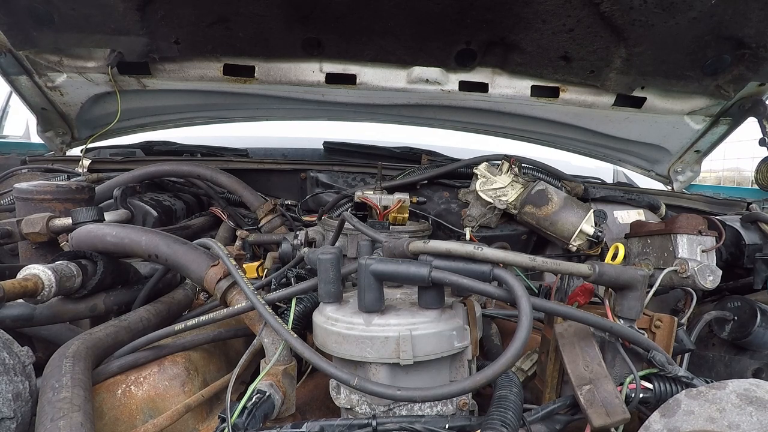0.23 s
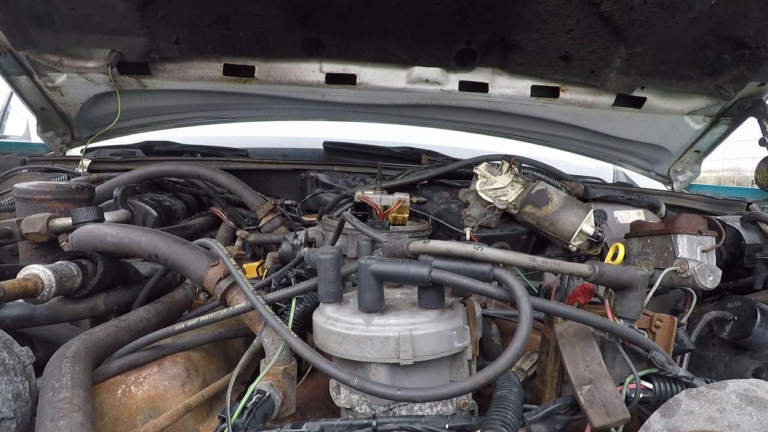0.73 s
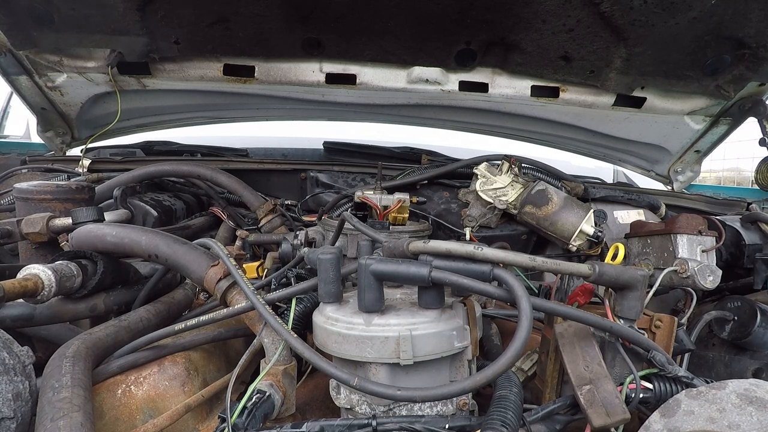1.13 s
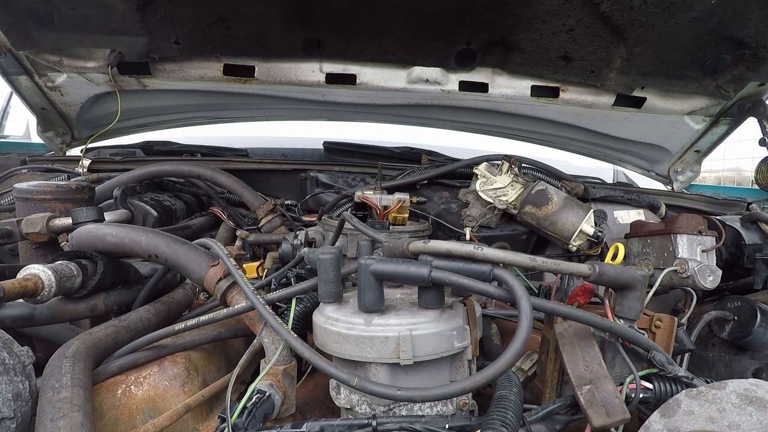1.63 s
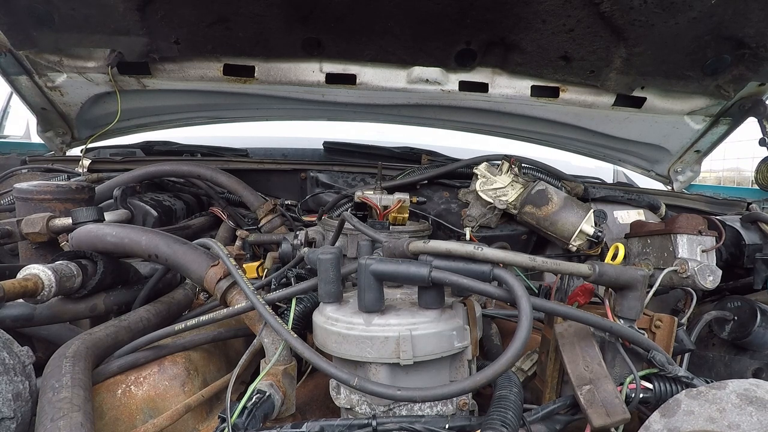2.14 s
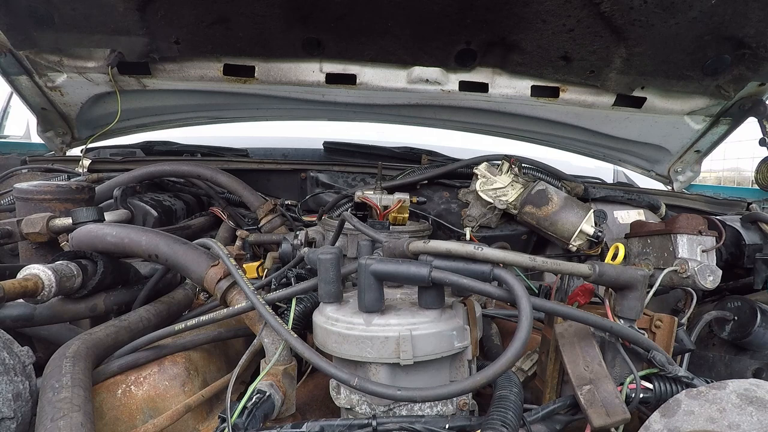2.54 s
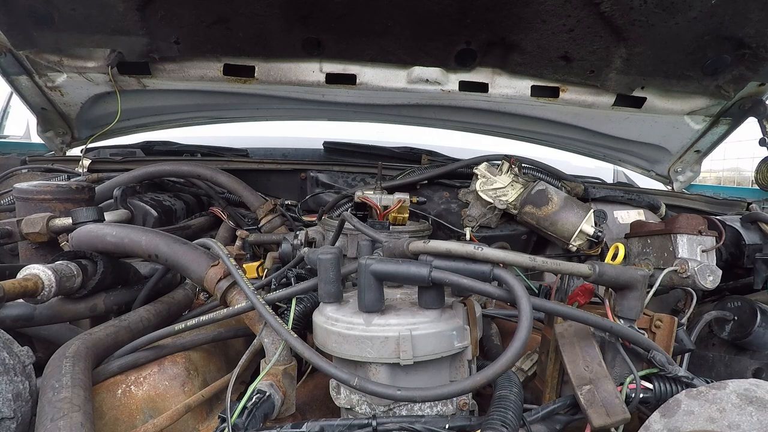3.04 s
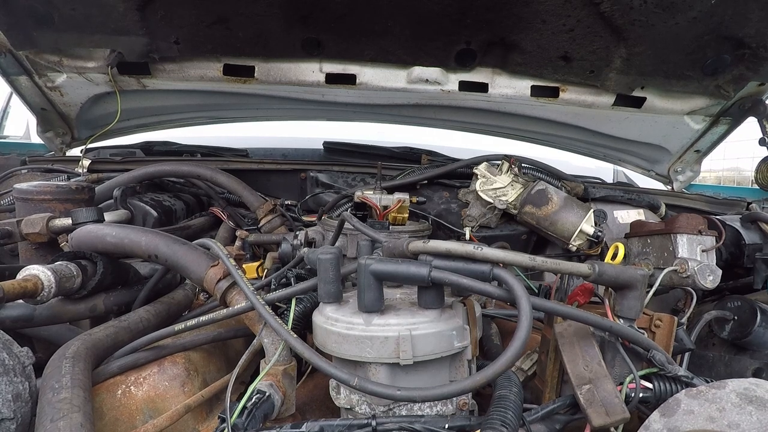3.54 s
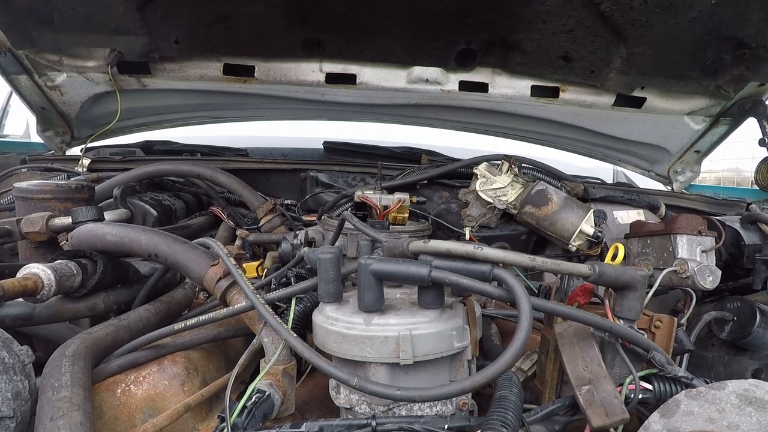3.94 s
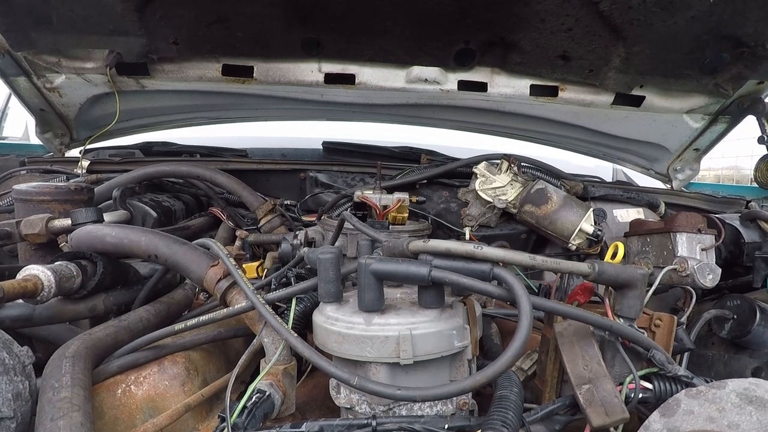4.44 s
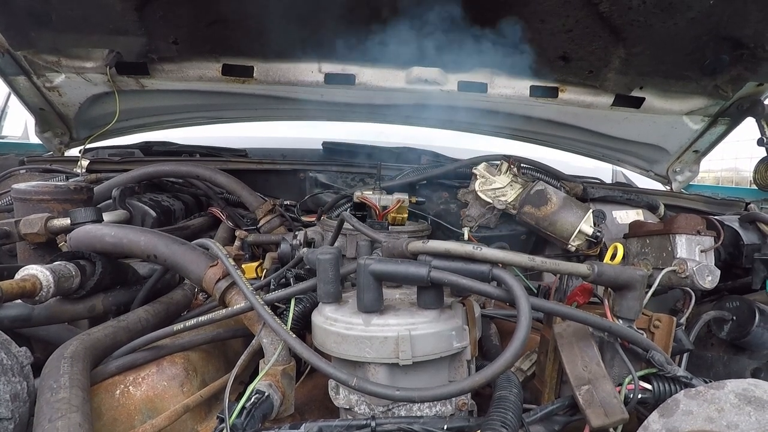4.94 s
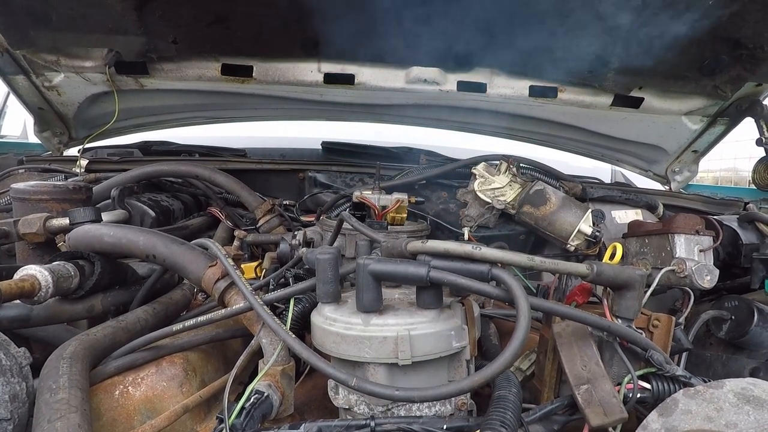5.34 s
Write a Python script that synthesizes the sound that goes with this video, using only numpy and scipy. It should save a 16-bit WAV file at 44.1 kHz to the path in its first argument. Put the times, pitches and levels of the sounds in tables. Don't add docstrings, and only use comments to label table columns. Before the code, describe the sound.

Steady duct hum and sharp contact clicks, then gritty, whirring starter gear noise surging and sagging with intake hisses and thuds, finally coasting down.

```python
import sys
import numpy as np
from scipy import signal
from scipy.fft import rfft, irfft
from scipy.io import wavfile
from scipy.ndimage import uniform_filter1d

SR = 44100
rng = np.random.default_rng(int(sys.argv[2]) if len(sys.argv) > 2 else 0)


def put_to_file(sound):
    columns = np.atleast_2d(sound).T
    safe = np.clip(columns, -1, 1)
    whole_steps = np.round(safe * 32767)
    wavfile.write(sys.argv[1], SR, whole_steps.astype(np.int16))


def invert_db(level):
    return 10 ** (np.asarray(level, dtype=float) / 20)


N = 246078
TIME_S = np.arange(N) / SR

START_S = 3.058
STROKE_S = 0.042
MEAN_LOAD_DB, MEAN_AIR_DB = -30, -50

# (time [s], level [dB])
AIR = [(3.07, -57), (3.15, -51.5), (3.42, -46), (3.46, -47), (3.59, -38), (3.715, -42), (3.76, -62.5),
       (3.84, -65), (3.88, -54), (4.11, -53.5), (4.25, -48), (4.32, -53.5), (4.36, -46), (4.57, -54.5),
       (4.84, -45.5), (4.93, -52), (5.42, -53.5), (5.58, -69.5)]
# (time [s], share of speed lost [0-1], tooth tone [dB], change of load [dB])
COMPRESSIONS = [(3.14, .03, -17.5, -2.5), (3.241, 0.29, -20, -2.5), (3.381, 0.19, -19, -2.5),
                (3.49, .12, -47, -1.5), (3.591, 0.021, -38, 2), (3.78, 0.096, -21, -5.5),
                (3.87, 0.025, -20, -0.5), (4.0, .17, -28, -2.5), (4.058, 0.0085, -27, 4),
                (4.131, 0.11, -47, 5.5), (4.48, 0.022, -30, 0.5), (4.781, .02, -45, 4),
                (4.881, 0.0099, -36, 2), (4.99, 0.049, -35, -7.5), (5.088, .04, -43, -4),
                (5.244, .17, -23, -5), (5.351, .14, -20.5, -4.5), (5.47, .15, -19, -3)]


def rms_one(x):
    return x / np.sqrt(np.mean(x ** 2) + 1e-20)


def in_time(rows):
    s, *columns = np.transpose(rows)
    return [np.interp(TIME_S, s, column) for column in columns]


def drift(rate_hz):
    r = np.exp(-2 * np.pi * rate_hz / SR)
    noise = rng.standard_normal(N + SR)
    return rms_one(signal.lfilter([1], [1, -2 * r, r * r], noise)[SR:])


def coloured(spectrum, lifts=()):
    hz, points = np.arange(N // 2 + 1) * SR / N + 1, np.array(spectrum)
    level_db = np.interp(np.log(hz), np.log(points[:, 0]), points[:, 1])
    for centre_hz, width_hz, lift_db in lifts:
        level_db = level_db + lift_db / (1 + (2 * (hz - centre_hz) / width_hz) ** 2)
    return rms_one(irfft(rfft(rng.standard_normal(N)) * invert_db(level_db), N))


def resonate(x, modes, flicker_db=0.0):
    out = 0
    for k, (hz, width_hz, db) in enumerate(modes):
        r = np.exp(-np.pi * width_hz / SR)
        a = [1, -2 * r * np.cos(2 * np.pi * hz / SR), r * r]
        b = [(1 - r * r) / 2, 0, (r * r - 1) / 2]
        gain_db = db + flicker_db * np.clip(drift(14.4), -2.5, 1.5) if flicker_db else db
        out = out + (-1) ** k * invert_db(gain_db) * signal.lfilter(b, a, x + 1e-18)
    return out


def ring(clicks, hz, t60_s):
    r, w = invert_db(-60 / (t60_s * SR)), 2 * np.pi * hz / SR
    return signal.lfilter([0, np.sin(w)], [1, -2 * r * np.cos(w), r * r], clicks + 1e-18)


def band(x, low_hz, high_hz):
    return signal.sosfilt(signal.butter(2, [low_hz, high_hz], "band", fs=SR, output="sos"), x)


def steep(x, low_hz, high_hz):
    return band(band(x, low_hz, high_hz), low_hz, high_hz)


def even(x, span_s):
    return x / np.sqrt(uniform_filter1d(x ** 2, int(span_s * SR)) + 1e-12)


def after(s, rise_s, decay_s):
    t = np.maximum(TIME_S - s, 0)
    shape = (1 - np.exp(-t / rise_s)) ** 2 * np.exp(-t / decay_s)
    return shape / shape.max()


def swell(s, width_s):
    return np.exp(-((TIME_S - s) / width_s) ** 2)


def engaged():
    return np.clip((TIME_S - START_S) / 0.0069, 0, 1)


def background():
    # (frequency [Hz], level [dB])
    floor_colour = [(1940, -15), (3300, -3), (3940, 5), (4620, -0.5), (5390, 3), (9540, 1), (13300, -12),
                    (14300, -16)]
    floor_db, ducked_db = -67, -8
    return invert_db(floor_db + ducked_db * engaged()) * coloured(floor_colour)


def blower():
    # (frequency [Hz], level [dB])
    air_colour = [(53, -59), (90, -27), (123, -22), (150, -11), (242, -13), (345, -5.5), (378, -9.5),
                  (441, -7), (701, -16), (769, -10.5), (1030, -14), (1520, -14), (3600, -33.5), (4680, -68),
                  (7920, -120)]
    # (frequency [Hz], width [Hz], lift [dB])
    duct = [(163.3, 23, 5.5), (235, 90, 10.5), (360, 23, 4), (444, 35, 12.5), (583, 150, 9.5), (790, 76, 9),
            (916, 30, 6.5), (1210, 28, 6), (1520, 73, 7.5), (2190, 520, 1.5)]
    air_db, fade_s = -36.5, 0.31
    wind_db = np.maximum(-53.5 - 8.5 * TIME_S, -72)
    running = np.exp(-np.maximum(TIME_S - START_S, 0) / fade_s)
    flutter = invert_db(.5 * drift(10) + .6 * drift(50))
    air = steep(coloured(air_colour, duct), 58, 2790) * invert_db(air_db) * flutter
    wind = rms_one(band(rng.standard_normal(N), 8.4, 97)) * invert_db(wind_db + 1.0 * drift(3.4))
    return running * air + wind


def ticks():
    # (time [s], level [dB], rattle decay [s], ping [Hz], ping level [dB])
    contacts = [(1.208, -16.5, 0.003, 8000, -18), (1.214, -21, 0.0029, 3900, -27),
                (1.226, -47, 0.018, 967, -31), (1.25, -60, .01, 990, -38), (1.243, -47, .006, 6400, -48),
                (1.322, -39.5, .0075, 2700, -43.5), (1.854, -70, .004, 570, -38),
                (2.332, -39.5, 0.0071, 5560, -37.5), (2.362, -60, .004, 7000, -55),
                (3.057, -20, 0.0023, 2550, -21.5), (3.0575, -40, .013, 710, -15.5),
                (3.063, -29.5, 0.0089, 400, -14), (3.161, -34, 0.0045, 7500, -32),
                (3.845, -47, .0033, 4000, -60), (5.476, -52, 0.003, 700, -29),
                (5.501, -52, .003, 8500, -58)]
    # (frequency [Hz], width [Hz], level [dB])
    case_modes = [(1880, 210, -13), (2700, 460, -12.5), (3900, 300, -6), (5280, 380, -10),
                  (6200, 620, -6.5), (8000, 2500, -9), (9830, 2000, -11), (12400, 910, -19)]
    # (frequency [Hz], level [dB], decay by 60 dB [s])
    knock_modes = [(180, -62, 0.019), (400, -2.5, 0.26), (633, -6, 0.29), (900, 2.5, 0.015),
                   (1598, 0, 0.022), (2550, 12, 0.0034)]
    relay_knock_db, solenoid_knock_db = -16.5, -11
    rattle, knocks, pings = np.zeros(N), np.zeros(N), np.zeros(N)
    grit = rng.standard_normal(N) * invert_db(0.34 * drift(1500))
    for s, db, decay_s, ping_hz, ping_db in contacts:
        at = round(s * SR)
        rattle += invert_db(db) * grit * (after(s, 0.00025, decay_s) + 0.078 * after(s, 0.0014, 0.01))
        knocks[at] = invert_db(ping_db + (relay_knock_db if s < 3 else solenoid_knock_db))
        pings += invert_db(ping_db) * ring(np.arange(N) == at, ping_hz, .012 + 55 / ping_hz)
    body = np.zeros(N)
    for k, (hz, db, t60_s) in enumerate(knock_modes):
        body += (-1) ** k * invert_db(db - 1.5) * ring(knocks, hz, t60_s)
    return 2.4 * resonate(rattle, case_modes) + steep(pings + body, 200, 7800)


def spits():
    # (time [s], hiss peak [dB], thud level [dB], thud [Hz], decay [s])
    bursts = [(4.340, -56, -20.5, 59.5, 0.034), (4.511, -24, -28, 89.8, 0.0084),
              (4.610, -44.5, -24.5, 72, .01), (4.627, -62, -29, 59.2, .01), (4.663, -46, -29, 152, 0.0052),
              (4.701, -28.5, -26, 128, 0.0079), (4.712, -27, -24, 115, .0072),
              (4.72, -35, -24, 118, 0.0023), (4.747, -48, -45, 74, 0.015), (4.873, -28, -28, 97.3, 0.0067),
              (5.476, -46, -20, 335, 0.022), (5.492, -66, -17.5, 312.5, 0.0092),
              (5.513, -47.5, -26, 192, 0.0048)]
    # (frequency [Hz], density [dB per Hz])
    gas_colour = [(240, -27), (400, -3), (1380, -15.5), (1720, -0.5), (2330, -16.5), (3810, -9),
                  (4370, -18), (8580, -13.5), (11100, -23), (14200, -17), (15600, -24)]
    rise_s = 0.0039
    gas = coloured(gas_colour) * invert_db(1.3 * drift(385.5))
    out = np.zeros(N)
    for s, hiss_db, thud_db, thud_hz, decay_s in bursts:
        envelope = after(s, rise_s, decay_s) + 0.21 * after(s, rise_s, 2.1 * decay_s)
        swing = np.sin(2 * np.pi * thud_hz * (TIME_S - s)) * after(s, 0.0026, 0.9 / thud_hz)
        out += invert_db(hiss_db) * gas * envelope + invert_db(thud_db) * swing
    return out


def crank():
    # (time [s], tooth rate between compressions [Hz], load on the teeth [dB])
    free_run = [(3.06, 165, -20), (3.09, 250, -29.5), (3.17, 400, -21.5), (3.48, 432.9, -23),
                (3.58, 599, -27), (3.66, 900, -25), (3.73, 520, -20.5), (3.77, 140.4, -28),
                (3.87, 184.2, -28), (3.94, 409.7, -23.5), (4.11, 422.4, -36.5), (4.3, 918, -36.5),
                (4.39, 791.4, -29.5), (4.49, 527, -33), (4.66, 796, -45), (4.79, 801.5, -40),
                (4.95, 429.7, -35.5), (5.58, 386, -33.5)]
    cranking_hz, release_s = 420, 5.45
    coast_db_per_s, coast_octaves_per_s = -110, -5
    free_hz, load_db = in_time(free_run)
    swells = np.array([swell(s, STROKE_S) for s, *_ in COMPRESSIONS])
    _, shares, _, changes_db = np.transpose(COMPRESSIONS)
    lost = np.clip(shares @ swells, 0, .9)
    coasting_s = np.maximum(TIME_S - release_s, 0)
    rate_hz = free_hz * (1 - lost) * 2 ** (coast_octaves_per_s * coasting_s)
    load_db = load_db + changes_db @ swells + coast_db_per_s * coasting_s
    return rate_hz, load_db, lost, np.log2(rate_hz / cranking_hz)


def engine_air():
    # (frequency [Hz], level [dB])
    hiss_colour = [(2710, -42), (4600, -8), (5170, 0), (6560, -3), (7080, -2), (9480, -3), (11400, -10),
                   (12500, -10), (16200, -54), (22000, -120)]
    # (frequency [Hz], width [Hz], level [dB])
    groan_modes = [(180.5, 18.8, 2.5), (242.5, 82, -6.5), (274, 81, -2)]
    # (time [s], exhaust level [dB], block level [dB], length
    # [s])
    kicks = [(3.11, -75, -16.5, 0.068), (3.3, -44, -55, 0.021), (3.455, -52, -45, 0.026),
             (3.688, -19, -23, 0.087), (3.77, -22, -42, 0.099), (4.12, -42, -65, .03),
             (4.263, -34, -52, 0.042), (4.359, -26, -33.5, 0.087), (4.52, -13, -40, .02),
             (4.61, -29.5, -41, 0.046), (4.745, -25.5, -42, .05), (4.854, -27.5, -46, 0.068),
             (5.29, -45, -33, 0.062), (5.406, -26.5, -32, 0.061), (5.525, -25.5, -23, .06)]
    (air_db,), (_, load_db, lost, octaves) = in_time(AIR), crank()
    hiss_db = air_db - 14 * lost
    top_rise = np.clip((TIME_S - 4.046) / 0.22 + .5, 0, 1)
    top_db = -88 + .8 * (air_db - MEAN_AIR_DB) + 23.5 * top_rise
    block = invert_db(-36.5 - 12 * octaves + 1.07 * (load_db - MEAN_LOAD_DB))
    exhaust = invert_db(-34) * np.clip((TIME_S - START_S) / .25, 0, 1)
    for s, exhaust_db, block_db, length_s in kicks:
        kick = swell(s, length_s)
        exhaust = exhaust + invert_db(exhaust_db) * kick
        block = block + invert_db(block_db) * kick
    flutter = invert_db(1.2 * drift(20) + .8 * drift(150))
    hiss = invert_db(hiss_db) * band(coloured(hiss_colour), 2300, 9900)
    top = invert_db(top_db) * rms_one(steep(rng.standard_normal(N), 12100, 14600))
    groan = even(resonate(band(rng.standard_normal(N), 69, 450), groan_modes), 0.062)
    rumble = even(band(rng.standard_normal(N), 23, 124), 0.073)
    return flutter * (hiss + top) + invert_db(-10.0) * block * groan + invert_db(-9.5) * exhaust * rumble


def roughness():
    # (start [s], end [s], roughness [0-1])
    chatter = [
        (3.0, 3.12, .6),
        (3.55, 3.89, .75),
        (4.18, 4.345, .88),
        (4.515, 4.765, .9),
        (5.46, 5.7, .6),
    ]
    clean, edge_s = .35, .05
    rough = clean
    for start_s, end_s, chattering in chatter:
        inside_s = np.minimum(TIME_S - start_s, end_s - TIME_S)
        rough = rough + (chattering - clean) * np.clip(inside_s / edge_s + .5, 0, 1)
    return rough


def starter():
    # (frequency [Hz], width [Hz], level [dB])
    housing_modes = [(349, 103, -8.5), (573.3, 42, 3), (786.4, 64, 3), (961, 53, -2.5), (1082, 68, -1),
                     (1240, 63, -1.5), (1398, 49, -4), (910, 2030, -14.5)]
    # (frequency [Hz], width [Hz], level [dB])
    cover_modes = [(1705, 52, -0.5), (2032, 74, -4.5), (2334, 12, -12.5), (2477, 33, -5), (2693, 17, -5),
                   (2920, 29, -5.5), (2040, 1340, -20)]
    # (frequency [Hz], width [Hz], level [dB])
    bracket_modes = [(3155, 230, 3.5), (3650, 71, 6.5), (3900, 180, -6), (4510, 210, 1), (4000, 3400, -5.5)]
    pinion_teeth = 9
    (rate_hz, casting_db, _, octaves), (air_db,), rough = crank(), in_time(AIR), roughness()

    load, rush = casting_db - MEAN_LOAD_DB, air_db - MEAN_AIR_DB
    covers_db = -40.5 + .5 * load + 0.5 * octaves + 0.45 * rush
    brackets_db = -48.5 + 0.08 * load + 1.5 * octaves + .5 * rush

    sings = invert_db(casting_db - 4.5 - 42 * np.abs(octaves))
    for s, _, tone_db, _ in COMPRESSIONS:
        sings = sings + invert_db(tone_db) * swell(s, STROKE_S)

    wobble = np.sin(2 * np.pi * np.cumsum(rate_hz) / SR / pinion_teeth + 0.46 * drift(10))
    turns = np.cumsum(rate_hz * (1 + .026 * drift(35) + .022 * wobble)) / SR
    late = np.maximum.accumulate(turns + .06 * rough * drift(200))
    bite = invert_db(1.7 * wobble + 1.4 * drift(30))
    strength = invert_db(0.78 * rng.standard_normal(N)) * np.sqrt(SR / rate_hz)
    blows = np.diff(np.floor(late), prepend=0) * strength
    struck = bite * (np.sqrt(1 - rough) * blows + np.sqrt(rough) * rng.standard_normal(N))

    casting = steep(resonate(struck, housing_modes, flicker_db=3.5), 135, 2070)
    covers = steep(resonate(struck, cover_modes, flicker_db=3.0), 830, 3310)
    scraped = struck + 1.8 * rng.standard_normal(N)
    brackets = steep(resonate(scraped, bracket_modes, flicker_db=4.0), 3200, 7400)
    tone = np.sqrt(2) * np.sin(2 * np.pi * turns) * bite * invert_db(3.5 * drift(28)) * (1 - rough)
    out = invert_db(-7.0) * sings * tone
    for db, part in ((casting_db, casting), (covers_db, covers), (brackets_db, brackets)):
        out = out + invert_db(db) * even(part, 0.044)
    return out


def scene():
    engine = engaged() * (starter() + engine_air())
    return (engine + spits() + ticks() + blower() + background())[None]


def top_cut(x):
    return signal.sosfilt(signal.butter(12, 16480, fs=SR, output="sos"), x)


def record(dry):
    rounded = .42 * np.tanh(dry / .42)
    low_pass = signal.cheby2(10, 50, 16300, fs=SR, output="sos")
    return top_cut(signal.sosfilt(low_pass, rounded))


dry = scene()
out = record(dry)
put_to_file(out)
```